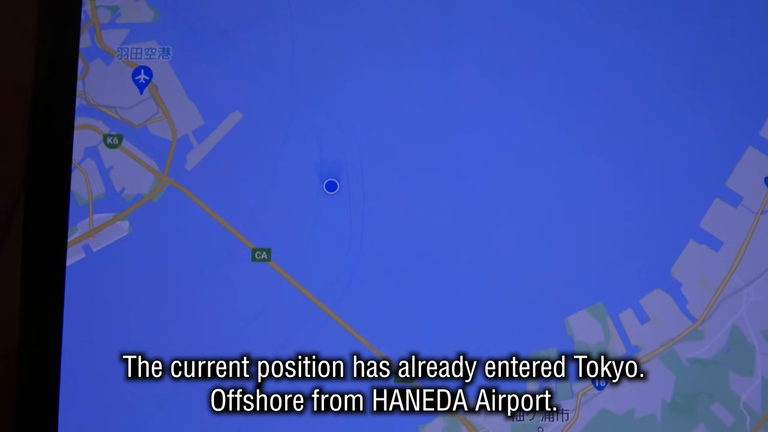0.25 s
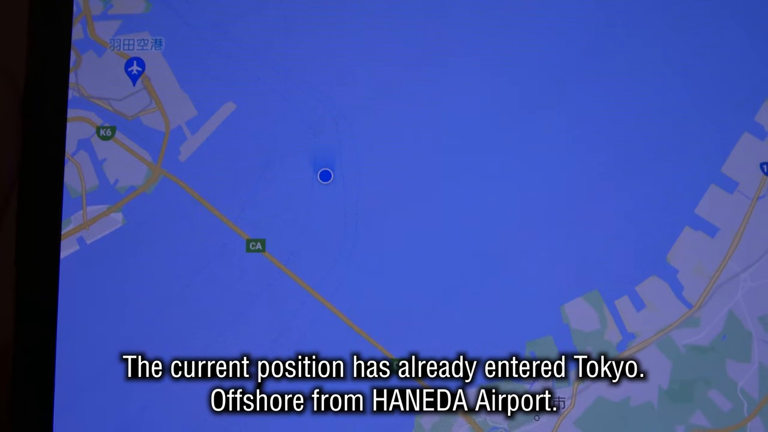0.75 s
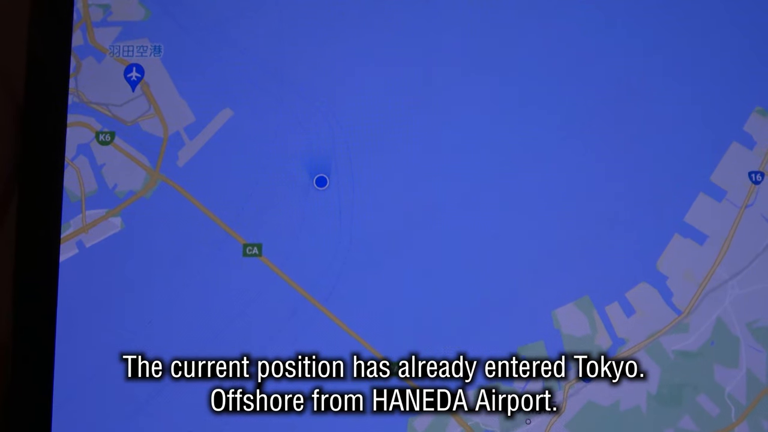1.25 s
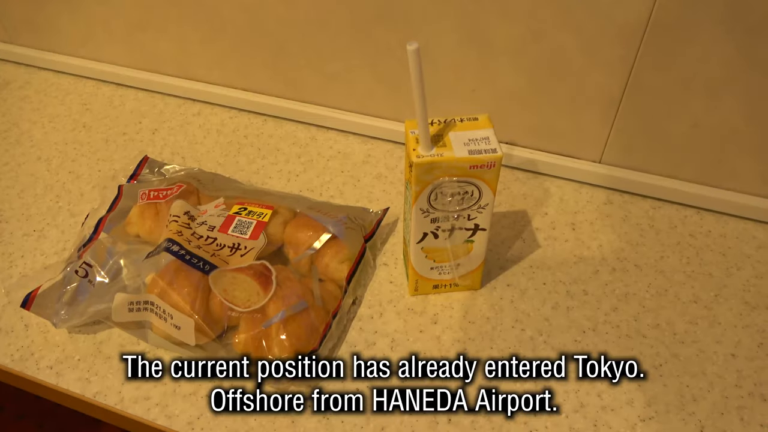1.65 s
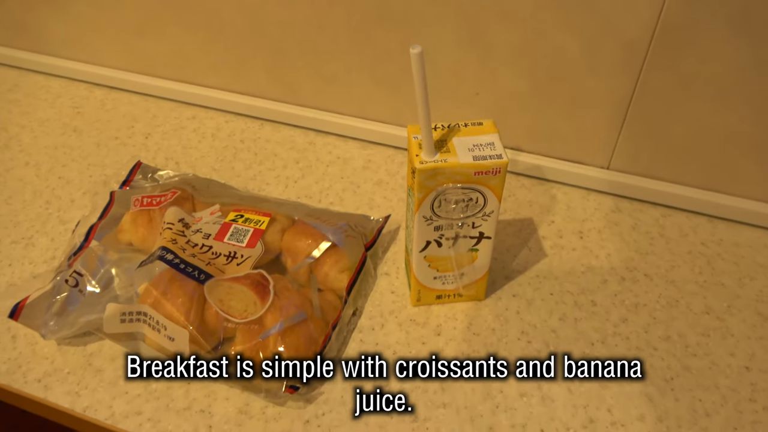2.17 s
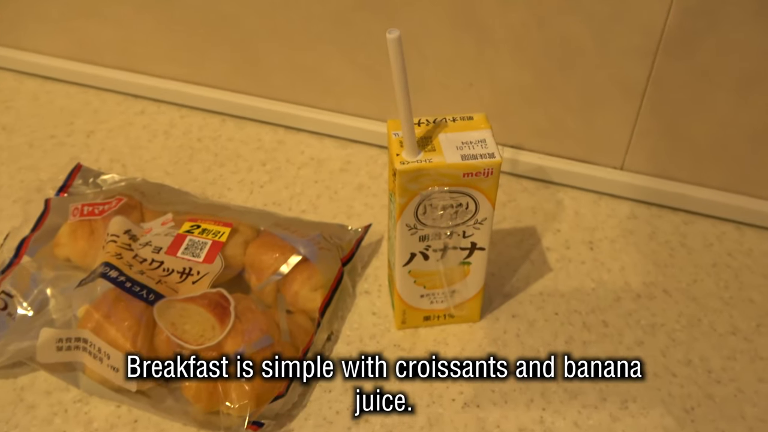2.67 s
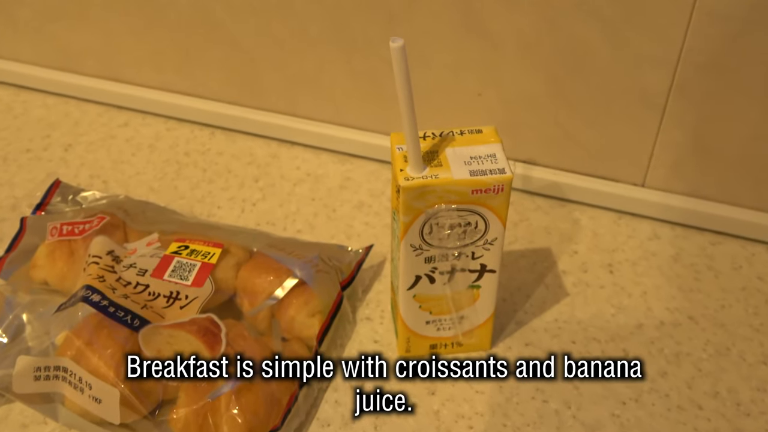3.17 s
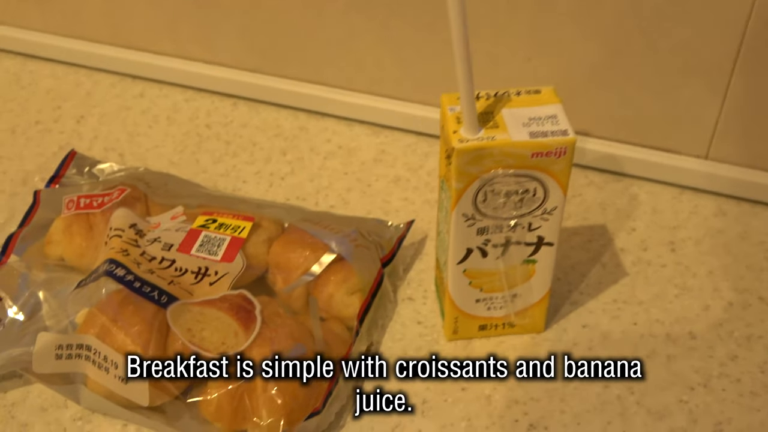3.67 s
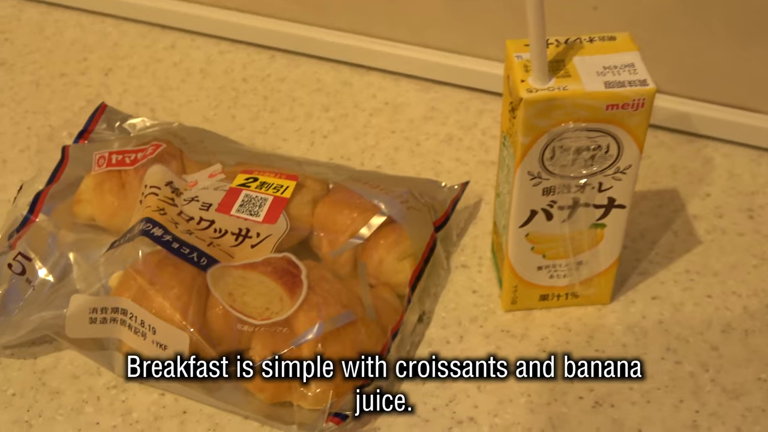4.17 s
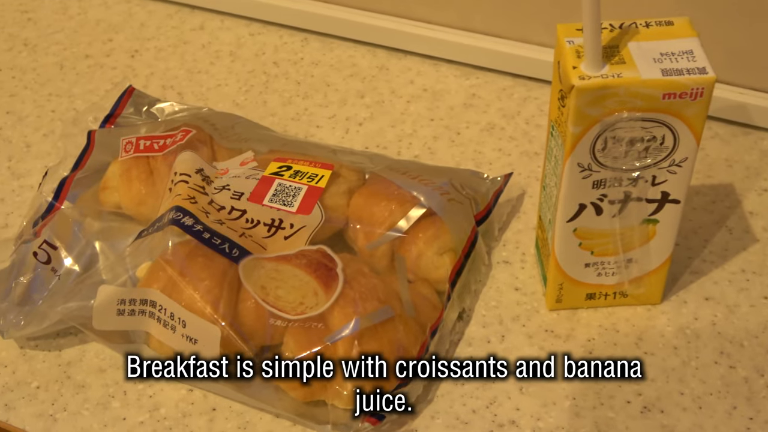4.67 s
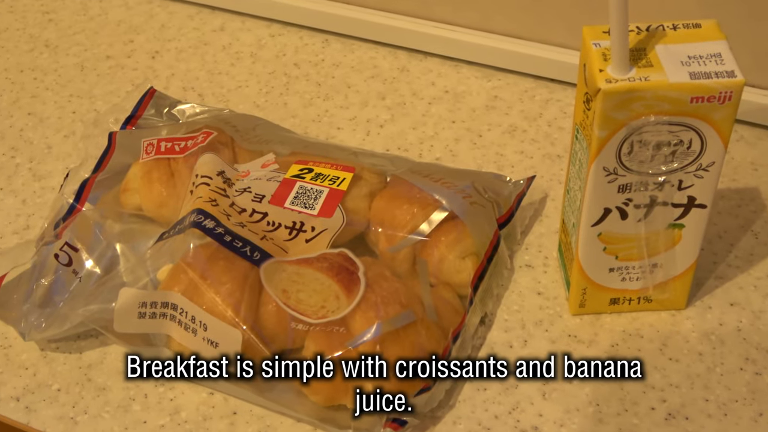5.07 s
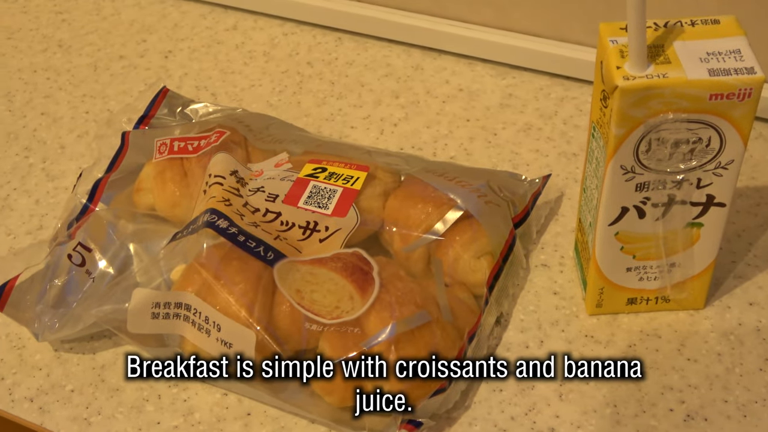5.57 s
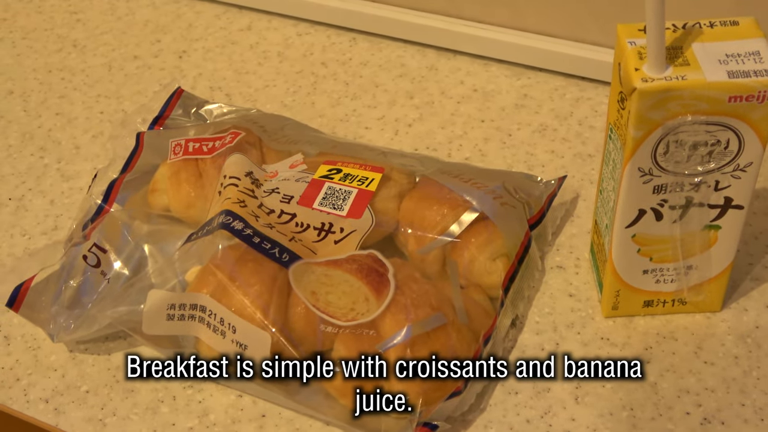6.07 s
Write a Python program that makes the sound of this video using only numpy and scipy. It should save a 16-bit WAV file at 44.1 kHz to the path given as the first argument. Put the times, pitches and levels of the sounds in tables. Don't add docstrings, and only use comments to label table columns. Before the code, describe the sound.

Inside a small ferry cabin, a continuous low rumble of engines and vibrating hull dominates, with muffled ventilation rush, faint generator hum and slight microphone hiss. From 0 to 1.5 seconds the rumble is somewhat softer, with a low wall drone swelling unevenly; a small tick falls near 0.7 and faint cloth rustles come around 0.2 and 1.0. At 1.5 the background switches quickly to another spot, louder and deeper, its boom throbbing just under twice a second. Light ticks follow around 1.7, 2.55 and 3.1, a small cluster of rustle and ticks near 3.6, and more quiet ticks around 4.4 and 5.35. The engine boom eases around 3.5 to 4, then strengthens after 4.5. At 6.1 a hard, bright latch snap with a short plastic knock cuts through, dying almost instantly with a tiny cabin tail. The rumble continues to the end, around 6.3.

```python
import sys
import numpy as np
from scipy import signal
from scipy.fft import rfft, irfft, next_fast_len
from scipy.io import wavfile
from scipy.ndimage import uniform_filter1d

SR = 44100
rng = np.random.default_rng(int(sys.argv[2]) if len(sys.argv) > 2 else 0)


def nominal_scale(level):
    x = np.asarray(level, float) / 20
    return 10 ** x


def int16_out(signal):
    q = np.round(np.clip(np.atleast_2d(signal).T, -1, 1) * 32767)
    wavfile.write(sys.argv[1], SR, q.astype(np.int16))


N = 279153


def along(points, hz):
    at_hz, value = np.transpose(points)
    return np.interp(np.log(np.maximum(hz, 1)), np.log(at_hz), value)


def level(x, db):
    return x * nominal_scale(db) / np.sqrt(np.mean(x ** 2))


def lean(x, db):
    return np.array([nominal_scale(db / 2) * x, nominal_scale(-db / 2) * x])


def walk(rate_hz):
    hold = int(SR / rate_hz)
    x = np.repeat(rng.standard_normal(N // hold + 1), hold)
    for _ in range(2):
        x = uniform_filter1d(x, hold, mode="wrap")
    return 1.26 * x[:N]


def fade(t, t60_s):
    return 1000 ** (-t / t60_s)


def band(x, hz, width):
    b, a = signal.iirpeak(min(hz, .4 * SR), 1 / width, fs=SR)
    return signal.lfilter(b, a, signal.lfilter(b, a, x))


def peaks(table, hz):
    return sum(lift_db / (1 + ((hz - f) / (width / 2)) ** 2) for f, width, lift_db in table)


def stereo_noise(colour_db, lean_db, apart_db, size):
    shared, apart = rfft(rng.standard_normal((2, size))) * nominal_scale(colour_db)
    return lean(shared, lean_db) + nominal_scale(apart_db) * np.array([apart, -apart])


def add(out, time_s, x):
    i = int(time_s * SR)
    out[i:i + len(x)] += x[:N - i]


def orders(table, paths, t, load_db):
    turn_hz, waver_db, slip_rad = 1.8066, 1.0, .15
    flip_order = 12.5
    out = np.zeros((2, N))
    for order, *spot_db, share in table:
        size = np.sqrt(2) * nominal_scale(share * load_db + waver_db * walk(3.05)) * np.sign(order - flip_order)
        slip = slip_rad * walk(2.3)
        for spot, (db, (delay, lead)) in enumerate(zip(spot_db, paths)):
            turns = order * (turn_hz * t - delay) + lead
            out[spot] += size * nominal_scale(db) * np.cos(2 * np.pi * turns + slip)
    return out


def engine_boom(t, load_db):
    # (order, first spot level [dB], second spot level [dB], share of load followed [0-1])
    firing = [(20, -66, -25, 1), (22, -46, -42, 0), (24, -64, -42, 0), (28, -62, -44, .4),
              (35, -64, -52, 0), (38, -45, -54, 0), (40, -46, -59, 0), (42, -48, -44, 0),
              (50, -61, -46, .9), (53, -64, -53, .8)]
    blades = [(9, -51, -48, 0), (11, -49, -48, 0), (12, -47, -42, 0), (13, -57, -48, 0), (15, -47, -40, 0),
              (16, -57, -41, .6), (18, -50, -38, 0), (19, -56, -40, .9), (21, -54, -34, .4),
              (23, -54, -44, 0), (25, -57, -46, 0), (26, -51, -47, 0), (27, -53, -48, 0), (43, -51, -50, 0)]
    firing_path = [(.21, .74), (0, .19)]
    blade_path = [(.1, .96), (-1 / 6, -.03)]
    boom = orders(firing, firing_path, t, load_db) + orders(blades, blade_path, t, load_db)
    return [lean(x, 1.7) for x in boom]


def rumble(spectrum, cabin_modes, leaning, db, load_db, air_db):
    # (frequency [Hz], level against shared part [dB])
    apart = [(20, -32), (80, -28), (140, -17), (450, -10), (800, -13), (1300, -11), (2200, -16),
             (4000, -22)]
    follows_load, flicker_db = 0.09, .9
    size = next_fast_len(N)
    hz = np.fft.rfftfreq(size, 1 / SR)
    colour_db = along(spectrum, hz) + peaks(cabin_modes, hz)
    colour_db -= 30 * np.log10(1 + (11 / np.maximum(hz, 1)) ** 2 + (hz / 6000) ** 2)
    both = stereo_noise(colour_db, along(leaning, hz), along(apart, hz), size)
    octave = np.log2(np.clip(hz, 32, 8192))
    out = 0
    for centre in range(5, 14):
        part = irfft(both * np.maximum(1 - abs(octave - centre), 0), size)[:, :N]
        air = np.clip((centre - 7.5) / 2, 0, 1)
        drive_db = (0.5 - air) * follows_load * load_db + air * air_db
        out = out + part * nominal_scale(drive_db + flicker_db * walk(9))
    return level(out, db)


def cabin_rumble(load_db, air_db):
    # (frequency [Hz], density [dB per Hz])
    spectra = [
        [(18, 0.5), (26, -8), (33, -8), (50, 1), (62, -19), (100, -9.5), (150, -8.5), (190, -18), (270, -21),
         (430, -27.5), (950, -33), (1300, -35), (3080, -42), (3400, -49.5)],
        [(18, -1.5), (29, 0.5), (48, -5.5), (60, -3.5), (95, -7), (108, -9), (170, -15.5), (200, -21),
         (430, -31), (950, -36.5), (1300, -37.5), (2300, -43), (3050, -44), (3300, -52)],
    ]
    # (frequency [Hz], width [Hz], lift [dB])
    cabin_modes = [
        [(41.8, 6.9, 9), (74, 7.9, -6), (217, 55, 3), (301, 11, 6.5), (335, 15, 4), (713, 86, 9),
         (1060, 110, 4), (1880, 51, 5)],
        [(28.5, 2.54, 8.5), (37, 4.3, 1.5), (50.4, 6.5, 2), (140, 26, 3.5), (172, 5.8, 7), (207, 27, 4.5),
         (281, 15, 3), (341.8, 13, 7), (560, 27, 6), (733.6, 96, 9), (860, 45, 6), (930, 70, -4),
         (1150, 120, 2.5), (1320, 53, 2.5), (1890, 34, 7)],
    ]
    # (frequency [Hz], left minus right [dB])
    leaning = [
        [(20, .8), (60, 3.5), (115, 5.5), (190, 3), (280, -3), (400, -2.5), (650, -6), (900, -3.8),
         (1500, -3.2), (2200, -1), (7000, 0)],
        [(20, .8), (48, 2.3), (70, 3.2), (130, 2.6), (200, 0), (330, -3.2), (480, -1.6), (750, -3.4),
         (900, -.6), (1300, -2.2), (2200, -.3), (7000, 0)],
    ]
    spot_db = [-37, -33.5]
    return [rumble(*spot, load_db, air_db) for spot in zip(spectra, cabin_modes, leaning, spot_db)]


def wall_drone(t, second):
    # (frequency [Hz], level [dB], left minus right [dB])
    drones = [
        (74.5, -42, 6),
        (85, -45.5, 8),
    ]
    # (time [s], level [dB])
    swell_points = [(0, -9), (.11, 3), (.2, -3), (.4, 0), (.52, -6), (.66, 2), (.86, -4), (1.05, 3),
                    (1.35, -3)]
    rough_db, push_rate_hz = -1.0, 22
    time_s, swell_db = np.transpose(swell_points)
    swell = nominal_scale((1 - second) * np.interp(t, time_s, swell_db))
    out = []
    for hz, db, lean_db in drones:
        push = nominal_scale(rough_db) * np.array([walk(push_rate_hz), walk(push_rate_hz)])
        phase = 2 * np.pi * hz * t
        mode = (1 + push[0]) * np.sin(phase) + push[1] * np.cos(phase)
        out.append(swell * lean(level(mode, db), lean_db))
    return out


def generator_hum(t, second):
    # (frequency [Hz], level [dB], left minus right [dB])
    lines = [(118.6, -48.5, 4.5), (177.8, -58, 2.5), (237.0, -55.5, 1.5), (296.3, -64.5, -2),
             (357.5, -64, -4)]
    waver_db, slip_rad, first_spot_db = 3, .7, -4
    out = 0
    for hz, db, lean_db in lines:
        size = np.sqrt(2) * nominal_scale(db + waver_db * walk(8))
        out = out + lean(size * np.sin(2 * np.pi * hz * t + slip_rad * walk(5)), lean_db)
    return nominal_scale(first_spot_db * (1 - second)) * out


def crack(t, noise, hz, t60_s, width=0.79):
    x = band(noise, hz, width) * fade(t, t60_s) * np.minimum(t / 0.0011, 1)
    return x / abs(x).max()


def struck(table, t):
    return sum((-1) ** k * nominal_scale(db) * np.sin(2 * np.pi * hz * t) * fade(t, t60_s)
               for k, (hz, db, t60_s) in enumerate(table))


def latch():
    # (time [s], click level [dB], body level [dB], crack level [dB], crack t60 [s])
    contacts = [
        (6.0985, -52, -40, -42, .01),
        (6.0994, -31, -50, -30, 0.011),
        (6.1073, -22, -53, -24.5, 0.01),
        (6.1077, -46, -29, -33, 0.036),
    ]
    # (frequency [Hz], level [dB], t60 [s])
    catch_modes = [(3350, -1.5, 0.008), (3970, 3, 0.0065), (5200, -1, 0.005), (7000, -0.5, 0.0057),
                   (7900, -11, 0.0093), (11040, -5, 0.0042), (12900, -11, 0.0039), (15000, -16, .004)]
    body_modes = [(246, -3.5, 0.065), (407, -2, 0.034), (623, 1, 0.018), (846, 6.5, 0.028),
                  (1010, -1, 0.028), (1150, 7.5, 0.024), (1380, -2, 0.041), (1660, -5.5, .02),
                  (1890, -1, 0.012), (2200, 3.5, 0.017), (2980, -1, 0.015), (3870, -4, 0.01),
                  (6560, -16, .015)]
    # (frequency [Hz], left minus right [dB])
    leaning = [(550, -4.5), (800, 0), (1400, 0), (1750, -4), (2300, -4), (3200, -1.5), (9000, -1.5),
               (13000, 1.5)]
    # (delay [s], level [dB])
    bounces = [
        (.0037, -13),
        (.0062, -22),
    ]
    crack_hz, apart_hz, apart_db = 4900, 7300, -3
    t = np.arange(4096) / SR
    bright, dull, apart = np.zeros((3, N))
    catch = struck(catch_modes, t) * np.minimum(t / 0.00049, 1)
    body = struck(body_modes, t) * np.minimum(t / 0.00083, 1)
    for time_s, click_db, body_db, crack_db, t60_s in contacts:
        noise = rng.standard_normal((2, len(t)))
        snap = nominal_scale(crack_db) * crack(t, noise[0], crack_hz, t60_s, width=0.84)
        add(bright, time_s, nominal_scale(click_db) * catch + snap)
        add(dull, time_s, nominal_scale(body_db) * body)
        differs = crack(t, noise[1], apart_hz, 0.8 * t60_s, width=0.6)
        add(apart, time_s, nominal_scale(crack_db + apart_db) * differs)
    bright, apart = (x + sum(nominal_scale(db) * np.roll(x, int(delay_s * SR)) for delay_s, db in bounces)
                     for x in (bright, apart))
    size = next_fast_len(N)
    both = lean(rfft(bright + dull, size), along(leaning, np.fft.rfftfreq(size, 1 / SR)))
    return irfft(both, size)[:, :N] + np.array([apart, -apart])


def ticks():
    # (time [s], peak [dB], ring [Hz], ring against crack [dB],
    # crack centre [Hz])
    moved_parts = [(0.6763, -41, 1070, 8.5, 1640), (0.6766, -53, 1880, 2, 1500), (0.6773, -55, 3980, 9, 3400),
                   (0.6762, -43, 2100, -1, 1500), (0.676, -53, 2750, 0, 3000), (1.08, -47, 3000, 2, 5000),
                   (1.2434, -45.5, 4450, 0.5, 3980), (1.7153, -42, 569, 5.5, 1600),
                   (1.715, -49, 3150, 7, 3500), (1.7152, -49, 1940, 2, 1300), (1.7225, -46, 1270, 2, 2500),
                   (1.892, -56, 7800, -4, 7000), (2.019, -51, 4880, -4, 7500), (2.129, -49, 6800, -4, 6630),
                   (2.466, -52, 3530, 0, 5460), (2.5546, -41.5, 1500, -30, 2520), (3.039, -55, 3970, -7, 4960),
                   (3.119, -38, 238, -2, 300), (3.1155, -48, 560, 6.5, 1600), (4.408, -51.5, 2340, 10, 1500),
                   (4.408, -53, 3460, 10, 3000), (5.3425, -45.5, 1450, 4.5, 2200),
                   (5.365, -50, 3700, -5, 3800), (5.445, -53, 2197, 3, 2158), (5.614, -49.5, 5200, -13, 4000),
                   (6.0978, -35, 1880, -3, 2000), (6.1955, -52, 840, 4, 1500), (4.4115, -52, 2830, 8, 2800),
                   (6.0997, -40, 6800, 9, 7000), (6.0995, -54, 11600, 6, 11500), (6.1086, -42, 6200, 7, 7800),
                   (6.198, -48, 520, 3, 600), (6.202, -50, 960, -2, 1100), (6.2075, -55, 900, -3, 1000),
                   (1.7143, -57, 4270, -2, 5500),
                   (0.5357, -54, 1740, -6, 2500), (1.5339, -53, 3030, -4, 3500), (1.738, -62, 2900, -8, 2500),
              (2.5555, -58, 7000, -2, 5000), (2.9886, -55, 1540, -6, 2500), (3.1143, -50, 1280, 3, 1600),
              (3.1145, -56, 4300, -3, 4500), (3.5648, -50, 4000, -6, 2500), (3.579, -58, 9500, -6, 7000),
              (3.587, -62, 3000, -10, 5000), (3.621, -55, 2500, -1, 5500), (3.6605, -48.5, 2070, -1, 3200),
              (4.2258, -49, 1840, -2, 3000), (4.8224, -58, 1300, 5, 5000), (5.343, -53, 5300, 0, 3000),
              (5.343, -56, 10500, -6, 10500), (5.368, -56, 7300, -3, 7300), (5.3835, -68, 7600, 9.5, 7600),
              (5.9858, -53, 1500, -6.5, 2000)]
    out, t = np.zeros(N), np.arange(4096) / SR
    for time_s, db, ring_hz, ring_db, crack_hz in moved_parts:
        t60_s = 0.011 + 0.033 * (1000 / ring_hz) ** 1.6
        ring = np.sin(2 * np.pi * ring_hz * t) * fade(t, t60_s) * np.minimum(t / 0.00047, 1)
        burst = crack(t, rng.standard_normal(len(t)), crack_hz, t60_s)
        add(out, time_s, nominal_scale(db) * (burst + nominal_scale(ring_db) * ring))
    return out


def rustles():
    # (time [s], level [dB], length [s], centre [Hz])
    slips = [(0.162, -61, .029, 2730), (0.931, -59, .037, 2620), (1.02, -64, .03, 2400),
             (1.14, -66, .05, 2500), (1.44, -65, .015, 2400), (1.462, -63, .035, 2580),
             (1.58, -67, .1, 5200), (1.65, -63, .06, 3100), (1.725, -65, .02, 1800),
             (1.756, -69, .05, 3000), (2.479, -66, .035, 3000), (2.575, -62.5, .04, 2600),
             (2.63, -66, .02, 5000), (3.129, -66, .038, 1500), (3.58, -61, .028, 3500),
             (3.6, -63, .03, 1700), (3.622, -68, .095, 5500), (3.635, -71, .02, 8000),
             (3.669, -58, .017, 2984), (3.68, -63, .02, 1900), (4.238, -61, .018, 3000),
             (4.304, -65, .018, 4992), (6.15, -63.5, .055, 6000), (1.555, -65, .04, 3000),
             (3.73, -62, .14, 1600), (4.95, -63, .07, 3000)]
    out, t = np.zeros(N), np.arange(-4096, 4096) / SR
    for time_s, db, length_s, hz in slips:
        noise, clump = rng.standard_normal((2, len(t)))
        grains = band(noise * nominal_scale(6.2 * clump), hz, 0.75)
        add(out, time_s + t[0], level(grains, db) * np.exp(-2 * (t / length_s) ** 2))
    return out


def echo(x):
    echo_db, t60_s, top_hz = -22, 0.15, 6000
    t = np.arange(int(.4 * SR)) / SR
    spectrum = stereo_noise(0, 0, -9, len(t))
    tail = irfft(spectrum / (1 + (np.fft.rfftfreq(len(t), 1 / SR) / top_hz) ** 2), len(t))
    tail = tail * fade(t, t60_s) * np.minimum(t / 0.0037, 1)
    tail = tail / np.sqrt((tail ** 2).sum() / 2)
    return nominal_scale(echo_db) * signal.fftconvolve(x[None], tail, axes=1)[:, :N]


def capsule_hiss():
    # (frequency [Hz], density [dB per Hz])
    spectrum = [(1500, 0), (4000, -1), (5000, -.5), (6200, 1.5), (8500, -1.5), (10500, -2), (13000, -4),
                (15700, -7)]
    # (frequency [Hz], level against shared hiss [dB])
    apart = [(2000, -4), (4500, -8), (5600, -1.5), (8000, -2), (12000, -5.5), (15500, -9)]
    port_hz, port_width_hz, port_db = 9570, 330, 5
    hiss_db, top_hz = -66, 15730
    size = next_fast_len(N)
    hz = np.fft.rfftfreq(size, 1 / SR)
    colour_db = along(spectrum, hz) - 20 * np.log10(1 + (1200 / np.maximum(hz, 1)) ** 2)
    colour_db += peaks([(port_hz, port_width_hz, port_db)], hz)
    both = stereo_noise(colour_db, 0, along(apart, hz), size) * (hz < top_hz)
    return level(irfft(both, size)[:, :N], hiss_db)


def scene():
    # (time [s], engine load [dB], ventilation [dB])
    drive = [(0, -12, -2.5), (.6, -13, -2), (1.3, -6, -2.5), (1.6, -5.5, 0.5), (1.9, 1.4, 0),
             (2.7, -1.5, 1), (2.95, -0.5, 0), (3.4, -7, -1), (3.9, -5.5, -1), (4.2, -1, -1), (4.7, 2, 1),
             (5.4, 2.5, -0.5), (6.0, 1, -0.1), (6.33, 7, -1)]
    change_s, change_length_s, small_lean_db = 1.49, 0.038, -3
    t = np.arange(N) / SR
    time_s, load, air = np.transpose(drive)
    load_db, air_db = np.interp(t, time_s, load), np.interp(t, time_s, air)
    second = np.clip((t - change_s) / change_length_s + .5, 0, 1)
    layers = zip(engine_boom(t, load_db), cabin_rumble(load_db, air_db), wall_drone(t, second))
    first_spot, second_spot = (boom + noise + drone for boom, noise, drone in layers)
    steady = (1 - second) * first_spot + second * second_spot + generator_hum(t, second)
    snap, small = latch(), ticks() + rustles()
    return steady + snap + lean(small, small_lean_db) + echo(small + snap.mean(axis=0))


def top_cut(x):
    return signal.sosfilt(signal.butter(12, 15745, fs=SR, output="sos"), x)


def record(dry):
    dull = signal.sosfilt(signal.butter(N=6, Wn=16000, fs=SR, output="sos"), dry)
    return top_cut(dull + capsule_hiss())


dry = scene()
out = record(dry)
int16_out(out)
```